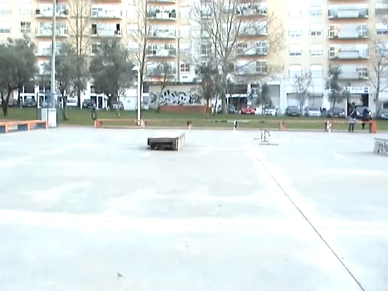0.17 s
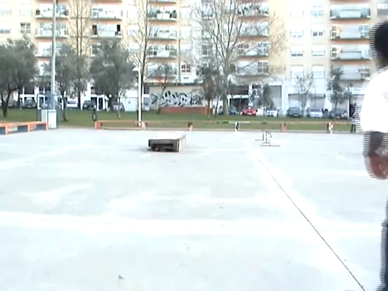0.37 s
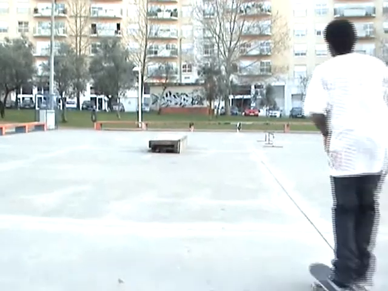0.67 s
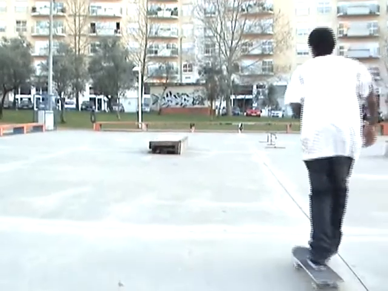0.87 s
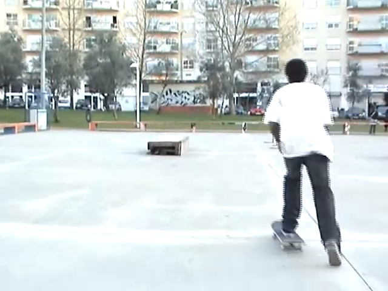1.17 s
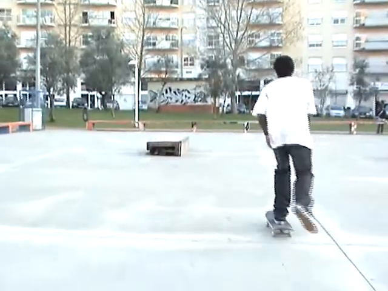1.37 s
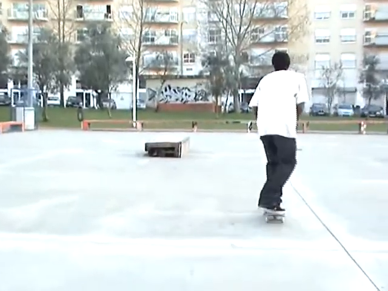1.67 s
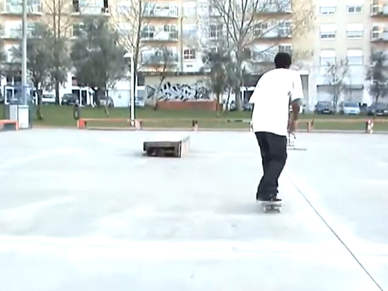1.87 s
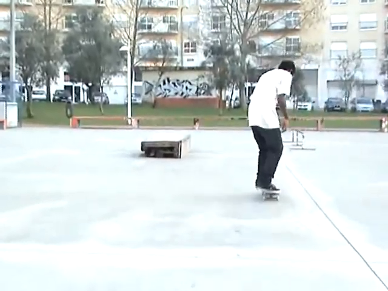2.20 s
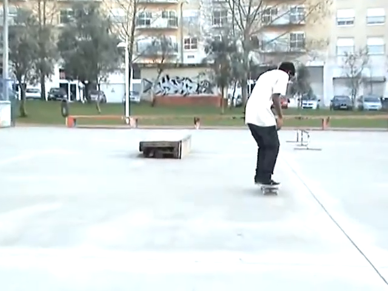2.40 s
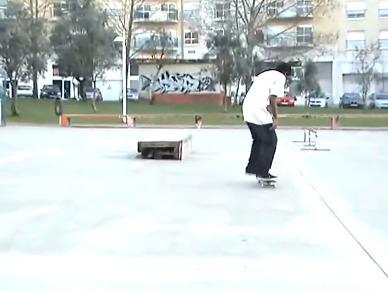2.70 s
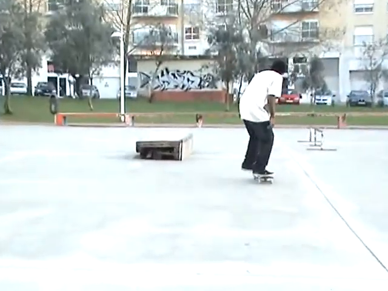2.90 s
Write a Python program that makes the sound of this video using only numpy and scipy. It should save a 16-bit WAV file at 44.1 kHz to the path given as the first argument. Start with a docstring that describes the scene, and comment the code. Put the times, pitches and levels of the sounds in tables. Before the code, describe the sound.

A skateboard rolls over concrete in an open park. After near silence, sound cuts in abruptly at 0.1 s with uneven gritty scrapes and clicks until 0.45. Steady rumble, roar and hiss follow, with knocks near 0.65. A shoe push swishes and rasps at 1.1-1.4, with a faint squeak; clacks at 1.45, 1.58, 1.8. Rolling softens, a faint rub at 2.5, double knock at 2.96, over low town hum.

```python
"""A skateboard rolls past close by and away over a concrete park: noise of tiny ground contacts is coloured
into deck rumble, wheel roar and tread hiss, and rings wheel resonances. Noise bursts give scrapes over grit,
the swish of a push and rasps of the sole; damped sines give knocks over joints and low thuds.
Coloured noise gives a steady low town hum underneath."""
import sys
import numpy as np
from scipy.fft import rfft, irfft, next_fast_len
from scipy.io import wavfile
from scipy.ndimage import map_coordinates

SR = 44100
rng = np.random.default_rng(int(sys.argv[2]) if len(sys.argv) > 2 else 0)


def generate_wav(signal):
    """Clip the signal to [-1, 1] and save it as 16-bit WAV at the path in sys.argv[1]."""
    frames = np.transpose(np.atleast_2d(signal))
    scaled = np.clip(frames, -1, 1) * 32767
    pcm = np.round(scaled).astype(np.int16)
    wavfile.write(sys.argv[1], SR, pcm)


N = 134505


def amp(db):
    """Decibels to gain."""
    return 10 ** (np.asarray(db) / 20)


def unit(x):
    """x scaled to rms 1."""
    return x / np.sqrt(np.mean(x ** 2) + 1e-20)


def along(points, hz):
    """(f/Hz, value) points interpolated on a log frequency axis."""
    f, v = np.transpose(points)
    return np.interp(np.log(hz + 1), np.log(f + 1), v)


def curves(rows):
    """One value per sample for each column after the time."""
    s, *cols = np.transpose(rows)
    return [np.interp(np.arange(N) / SR, s, c) for c in cols]


def since(s):
    """Seconds after s, zero before."""
    return np.maximum(np.arange(N) / SR - s, 0)


def white():
    """White noise, rms about 1."""
    return rng.standard_normal(N)


def wobble(rate_hz):
    """Smooth random curve through rate_hz random knots a second."""
    knots = rng.standard_normal(int(N * rate_hz / SR) + 4)
    return map_coordinates(knots, [np.arange(N) * rate_hz / SR])


def filtered(x, response):
    """x times a complex response of frequency."""
    m = next_fast_len(N + SR // 2)
    return irfft(rfft(x, m) * response(np.fft.rfftfreq(m, 1 / SR)), m)[..., :N]


def coloured(x, spectrum):
    """x with a (f/Hz, gain/dB) colour, rms 1."""
    return unit(filtered(x, lambda hz: amp(along(spectrum, hz))))


def rung(x, modes):
    """x through parallel (f/Hz, width/Hz, gain/dB) resonances, rms 1."""
    def response(f):
        return sum(amp(db) * 1j * f * w / (c * c - f * f + 1j * f * w) for c, w, db in modes)
    return unit(filtered(x, response))


def contacts(rate_hz, spread_db, smooth_db):
    """Tiny random-signed impacts on the grain of the concrete over smooth friction noise, rms 1."""
    present = rng.random(N) < rate_hz / SR
    sign = np.sign(white())
    hits = present * sign * amp(spread_db * np.clip(white(), -2, 2))
    return unit(unit(hits) + amp(smooth_db) * white())


def ground():
    """Dense, even contacts with the rough ground."""
    return contacts(rate_hz=1500, spread_db=1, smooth_db=1.5)


def stroke(s, length, rise, fall):
    """Linear rise from s, hold, exponential fall from s + length (fall is the 1/e time)."""
    return np.minimum(since(s) / rise, 1) * np.exp(-since(s + length) / fall)


def strokes(rows):
    """Summed strokes from (t/s, length/s, rise/s, fall/s, level/dB) rows."""
    return sum(amp(db) * stroke(s, length, rise, fall) for s, length, rise, fall, db in rows)


def struck(t, modes):
    """Damped (f/Hz, level/dB, t60/s) sines, t seconds after a blow."""
    return sum(amp(db - 60 * t / t60) * np.sin(2 * np.pi * hz * t) for hz, db, t60 in modes)


def wavering(x):
    """The pitch of x wanders as the load shifts between the wheels: a randomly varying delay, rms 1."""
    rate_hz = 24
    drift_samples = .028 * wobble(rate_hz) * SR / rate_hz / 2
    return unit(map_coordinates(x, [np.arange(N) + drift_samples], mode="mirror"))


def town(level_db=-39.0):
    """Steady low rumble of distant traffic: coloured noise."""
    # town colour: f/Hz, gain/dB
    town_colour = [(20, -21), (45, 7.5), (90, -6), (200, -8), (1000, -25), (3000, -24.5), (8000, -52),
                   (15000, -51)]
    return amp(level_db) * coloured(white(), town_colour)


def squeak():
    """A thin squeak under the push: one sine, randomly swelling."""
    s, hz, level_db = 1.18, 3715, -29
    tone = np.sin(2 * np.pi * hz * since(s))
    return amp(level_db) * stroke(s, length=.11, rise=.02, fall=.015) * wobble(30) * tone


def rasps():
    """The sole grips and slips in short bright strokes of coarse friction, mostly during the push."""
    # rasps: t/s, length/s, level/dB
    rasp_events = [(0.156, 0.02, -32.5), (1.124, 0.0064, -22.5), (1.145, .003, -21), (1.157, 0.0037, -22),
                   (1.203, 0.0048, -20), (1.217, .004, -24), (1.225, .005, -23), (1.2706, 0.0072, -19.5),
                   (1.285, 0.0055, -24), (1.324, 0.0074, -20), (1.336, .005, -25), (1.356, 0.0078, -19.5),
                   (2.55, 0.0044, -29), (2.637, 0.0064, -29)]
    # rasp colour: f/Hz, gain/dB
    rasp_colour = [(700, -16), (1200, 8), (1900, 8.5), (2600, -1), (3800, -2), (4700, -6), (6000, 4.5),
                   (8000, -5), (9300, -10.5), (15000, -33)]
    level = sum(amp(db) * stroke(s, length, rise=.002, fall=.0017) for s, length, db in rasp_events)
    return level * coloured(contacts(rate_hz=2500, spread_db=1.5, smooth_db=-7), rasp_colour)


def swishes():
    """Pushing and shifting weight rub sole and treads on concrete, crush grit and make the board sing."""
    # swishes: t/s, length/s, rise/s, fall/s, level/dB
    swish_events = [(1.093, 0.28, 0.095, 0.04, -28), (2.524, 0.11, 0.027, 0.022, -36.5)]
    # rub colour: f/Hz, gain/dB
    rub_colour = [(700, 4.5), (1150, 12), (1450, 17), (2200, 1), (3000, 4), (3750, 7), (4500, -2),
                  (6000, 0.5), (7900, 4), (8800, -10), (11000, -6), (15000, -88)]
    # crushed grit colour: f/Hz, gain/dB
    crackle_colour = [(2000, -26), (3700, -2), (6000, 8.5), (7900, -14), (9000, -7), (12000, -13.5),
                      (15000, -45)]
    # board resonances: f/Hz, width/Hz, gain/dB
    sing_modes = [(1812, 28, 17.5), (543, 35, -22), (5790, 53, -11), (6100, 110, -21), (8050, 68, 1)]
    crackle_db, sing_db = -6, -1  # over the rub
    rub = coloured(contacts(rate_hz=3000, spread_db=6.5, smooth_db=-7.5), rub_colour)
    crackle = coloured(contacts(rate_hz=390, spread_db=2, smooth_db=-11), crackle_colour)
    sing = rung(white(), sing_modes)
    mix = amp(2.3 * wobble(120)) * rub + amp(crackle_db) * crackle + amp(sing_db) * sing
    return strokes(swish_events) * mix


def scrapes():
    """Wheels grind sideways over grit in uneven bursts, with the ringing of the trucks."""
    # scrapes: t/s, length/s, rise/s, fall/s, level/dB
    scrape_events = [(0.14, 0.056, 0.013, .022, -29), (0.22, .013, 0.0046, .008, -21.5),
                     (0.25, 0.0053, .002, .005, -22), (0.26, 0.038, 0.0027, .01, -31),
                     (0.299, .016, 0.0089, 0.0047, -23), (.319, 0.011, .002, 0.0072, -20.5),
                     (.335, .014, .003, 0.019, -25), (0.395, 0.032, .011, 0.055, -29)]
    # grind colour: f/Hz, gain/dB
    grind_colour = [(500, -28), (900, 2), (1400, 11.5), (2800, 6), (4200, -1), (5200, -12), (7900, -1.5),
                    (9300, -31), (11500, -14), (15500, -42)]
    # truck resonances: f/Hz, width/Hz, gain/dB
    truck_modes = [(1296, 70, 4), (2300, 58, -2), (2840, 98, -0.5), (3670, 63, 0), (4130, 71, -4)]
    truck_db = -5.5  # over the grind
    grind = coloured(contacts(rate_hz=2400, spread_db=3.5, smooth_db=-10), grind_colour)
    trucks = rung(white(), truck_modes)
    return strokes(scrape_events) * amp(1.4 * wobble(161.7)) * (grind + amp(truck_db) * trucks)


def clicks():
    """Sharp clicks of grit and trucks: fast-decaying snaps of coloured noise."""
    # clicks: t/s, level/dB
    click_events = [(0.226, -22), (0.2365, -24), (0.2418, -14), (.294, -12), (0.3222, -12), (0.517, -19.5),
                    (1.177, -16), (1.45, -13), (1.486, -26), (1.5822, -11), (1.856, -26), (2.9558, -18),
                    (2.963, -15.5)]
    # click colour: f/Hz, gain/dB
    click_colour = [(500, -5), (1500, 9), (2600, 1), (5000, -1.5), (8000, -0.5), (9500, -18), (15000, -22)]
    rise_s, t60_s = .0014, .018
    snap = sum(amp(db - 60 * since(s) / t60_s) * np.minimum(since(s) / rise_s, 1) for s, db in click_events)
    return snap * coloured(white(), click_colour)


def thuds():
    """Low thuds of the rider's weight: damped sines with a soft onset."""
    # thuds: t/s, relative level/dB, f/Hz, t60/s
    thud_events = [(0.6523, -6.5, 84, 0.058), (1.176, -8, 116, 0.055), (1.232, -15, 115, 0.075),
                   (1.7792, -11, 78, 0.051), (1.7916, -1.5, 115, 0.017)]
    rise_s = .011
    out, t = np.zeros(N + SR), np.arange(SR // 5) / SR
    for s, db, hz, t60 in thud_events:
        out[round(s * SR):][:len(t)] += (1 - np.exp(-t / rise_s)) * struck(t, [(hz, db, t60)]) * 2
    return out[:N]


def knocks():
    """Short blows of wheels and deck ring damped modes of wheel, deck and trucks."""
    # knocks: t/s, relative level/dB, main f/Hz, t60/s, deck body over main/dB, truck clack over main/dB
    knock_events = [(.2285, -7.5, 693, 0.042, -25, -8), (0.2433, -17, 704, .015, -12, -4),
                    (.2645, -6, 678, 0.033, -28, -5), (.652, -7.5, 616, 0.01, -6, -12),
                    (.668, -3, 740, 0.017, -21, -18), (1.179, -10, 553, 0.019, -2.5, -13),
                    (1.229, -5, 680, 0.021, -8, -14), (1.445, -9.5, 456, 0.026, -4.5, -26),
                    (1.4498, -0.5, 647, 0.032, -3, -12.5), (1.577, -17, 490, 0.013, -10, -6),
                    (1.583, -6, 513, 0.036, -2.5, -2), (1.778, -6.5, 890, 0.019, -7, -6),
                    (1.794, -4, 673, 0.019, -6.5, -10), (1.856, -2.5, 670, 0.019, -10, -11),
                    (2.016, -9.5, 620, .04, -9, -4), (2.309, -15, 500, 0.034, -10, -3),
                    (2.9563, 2, 480, 0.014, -9.5, -16), (2.9622, -3, 708, .032, -8.5, -4)]
    # deck modes: f/Hz, level/dB, t60/s
    body_modes = [(260, -2.5, 0.039), (344, -4, .04), (522, -5, 0.027)]
    # truck modes: f/Hz, level/dB, t60/s
    clack_modes = [(1074, -1, .018), (1350, -6.5, 0.019), (1790, -1.5, 0.015), (2270, -6, .012)]
    rise_s = .0015
    out, t = np.zeros(N + SR), np.arange(SR // 5) / SR
    onset = 1 - np.exp(-t / rise_s)
    for s, db, hz, t60, body_db, clack_db in knock_events:
        ring = struck(t, [(hz, 0, t60)])
        ring = ring + amp(body_db) * struck(t, body_modes) + amp(clack_db) * struck(t, clack_modes)
        out[round(s * SR):][:len(t)] += amp(db) * onset * ring * 1.063
    return out[:N]


def stray_grit(hiss_db):
    """Stray grains under the treads: sparse impacts, 15 dB under the given hiss level."""
    # grit colour: f/Hz, gain/dB
    grit_colour = [(500, 9), (1500, 6), (2600, -16), (5000, -3), (7500, 7), (9000, -26), (15000, -45)]
    return amp(hiss_db - 15) * coloured(contacts(rate_hz=120, spread_db=3.5, smooth_db=-41), grit_colour)


def deck_drones():
    """The loaded deck drones for a while: ground contacts through one narrow resonance."""
    # drones: t/s, length/s, f/Hz, level/dB
    drone_events = [(1.931, 0.19, 152.6, -27), (2.62, 0.47, 349, -36.5)]
    width_hz = 18.5
    return sum(amp(db) * stroke(s, length, rise=.068, fall=.062) * rung(ground(), [(hz, width_hz, 0)])
               for s, length, hz, db in drone_events)


def tread_hiss(level_db):
    """The treads hiss: mostly smooth friction, coloured bright."""
    # hiss colour: f/Hz, gain/dB
    hiss_colour = [(1200, -8), (2600, -0.5), (3800, 3.5), (5600, 2.5), (7600, 1), (9000, -11.5),
                   (12000, -31), (15500, -30)]
    return amp(level_db) * coloured(contacts(rate_hz=1700, spread_db=0, smooth_db=8.5), hiss_colour)


def wheel_ring(bumps):
    """Ground contacts ring the wheels: a wavering lower resonance and a steady-pitched upper one."""
    # wheel resonances: f/Hz, width/Hz, gain/dB
    wheel_modes = [(692.4, 45, 1.5), (1765, 78, 0)]
    # ring: t/s, lower level/dB, upper level/dB
    ring_levels = [(.1, -39, -43), (.17, -20.5, -42), (.21, -31.5, -31), (.24, -23, -47), (.3, -37.5, -38),
                   (.345, -18.5, -33), (.4, -29, -35), (.56, -29, -38), (.72, -27, -63),
                   (1.08, -34.5, -31.5), (1.22, -23.5, -29.5), (1.35, -21, -37), (1.48, -39, -29),
                   (1.62, -31.5, -35), (1.85, -35.5, -34.5), (2.3, -44.5, -51), (3.05, -30, -42)]
    lower_db, upper_db = curves(ring_levels)
    lower = wavering(rung(ground(), wheel_modes[:1]))
    upper = rung(ground(), wheel_modes[1:])
    return amp(lower_db + .66 * bumps) * lower + amp(upper_db) * upper


def truck_rattle():
    """Small jolts, dulled by the urethane, ring the trucks; rms 1."""
    # urethane: f/Hz, gain/dB
    soft_tread = [(2000, 0), (4000, -12), (9000, -35)]
    # truck rattle resonances: f/Hz, width/Hz, gain/dB
    rattle_modes = [(523, 46, -9), (747, 130, 0.5), (1290, 100, -10.5), (1810, 260, 2)]
    return rung(coloured(contacts(rate_hz=45, spread_db=4.0, smooth_db=-40), soft_tread), rattle_modes)


def wheel_roar(level_db):
    """Ground contacts roar in the wheels; the near colour gives way to the far one, trucks rattle."""
    # near colour: f/Hz, gain/dB
    near_colour = [(200, -53), (430, -15), (530, 4.5), (700, -1), (920, -4.5), (1350, -2.5), (1850, -6),
                   (2150, -10), (3000, -20.5), (5000, -40)]
    # far colour: f/Hz, gain/dB
    far_colour = [(200, -6), (420, 1.5), (510, 2.5), (730, 3), (1000, -3), (1220, 3), (1550, -2.5),
                  (1850, -1.5), (2100, -9), (3000, -16), (5000, -40)]
    rattle_db = -16  # over the roar
    far, = curves([(1.275, 0), (1.82, 1)])  # crossfade: t/s, far share of power
    roar = np.sqrt(1 - far) * coloured(ground(), near_colour) + np.sqrt(far) * coloured(ground(), far_colour)
    return amp(level_db) * (roar + amp(rattle_db) * truck_rattle())


def deck_rumble(level_db):
    """Ground contacts shake the deck: low coloured noise."""
    # deck colour: f/Hz, gain/dB
    deck_colour = [(20, -37), (42, -12), (90, -7), (150, 0), (260, -2.5), (400, -9), (600, -33),
                   (1500, -44)]
    return amp(level_db) * coloured(ground(), deck_colour)


def rolling():
    """Rough ground shakes deck and wheels while the treads hiss; shared bumps sway the levels."""
    # rolling: t/s, deck rumble level/dB, wheel roar level/dB, tread hiss level/dB
    roll_levels = [(.1, -31, -28, -38.5), (.2, -34, -30, -31.5), (.4, -27, -26.5, -36.5),
                   (.55, -27, -24, -36.5), (.8, -27.5, -28, -39), (1.05, -26.5, -26, -39),
                   (1.22, -27, -23.5, -34.5), (1.38, -30, -23, -30.5), (1.52, -27.5, -24.5, -37),
                   (1.72, -30, -27.5, -39.5), (1.87, -25, -26, -39.5), (2.04, -35, -23.5, -35.5),
                   (2.29, -28.5, -24.5, -40), (2.5, -36.5, -26.5, -43.5), (2.7, -31.5, -25.5, -39.5),
                   (3.05, -37, -28, -42)]
    deck_db, roar_db, hiss_db = curves(roll_levels)
    bumps = wobble(70)
    board = deck_rumble(deck_db + 1.9 * bumps) + wheel_roar(roar_db + .61 * bumps)
    board = board + wheel_ring(bumps) + deck_drones()
    return board + tread_hiss(hiss_db + 1.07 * bumps) + stray_grit(hiss_db)


def ports(direct, scattered):
    """Two close microphone ports: alike in the bass, drifting apart in phase in the treble."""
    # quadrature side over mid, right port leading: f/Hz, gain/dB
    lead = [(40, -8), (150, -18), (300, -15.5), (1000, -21.5), (1500, -38), (2300, -42), (3500, -63),
            (5000, -37), (6400, -11), (7900, -5), (9300, 1), (15000, 5.5)]
    # scattered side over mid: f/Hz, gain/dB
    scatter = [(50, -17), (150, -24), (400, -25.5), (1000, -18), (1400, -25), (2300, -32.5), (3400, -53),
               (4400, -29), (6500, -16.5), (9000, 0.5), (15000, 4)]
    # balance: f/Hz, left over right/dB
    balance = [(30, 2.5), (70, 1.2), (160, 0), (450, -.8), (1200, -.4), (2000, 0), (3800, 0), (5500, 1),
               (9000, 2.5), (13000, -2)]
    side = filtered(direct, lambda hz: -1j * amp(along(lead, hz)))
    side = side + filtered(scattered, lambda hz: amp(along(scatter, hz)))
    pair = np.array([direct + side, direct - side])
    return filtered(pair, lambda hz: amp(np.outer([.5, -.5], along(balance, hz))))


def scene():
    """Board and town, heard directly and, as independent noise, scattered by the surroundings."""
    def ride():
        return town() + squeak() + rasps() + swishes() + scrapes() + rolling()
    return ports(ride() + clicks() + thuds() + knocks(), ride())


def record(dry):
    """Sound cuts in after a moment of near silence; the treble rolls off, then stops at a band limit."""
    start_s, rise_s, idle_db = .0975, .00063, -55
    edge_hz, top_hz = 12840, 15750
    gate = np.clip(since(start_s) / rise_s, amp(idle_db), 1)
    return filtered(dry * gate, lambda hz: (hz < top_hz) / np.sqrt(1 + (hz / edge_hz) ** 20))


dry = scene()
out = record(dry)
generate_wav(out)
```